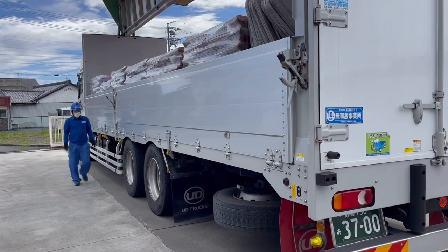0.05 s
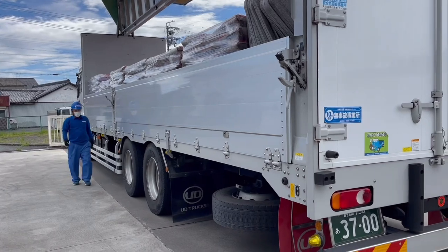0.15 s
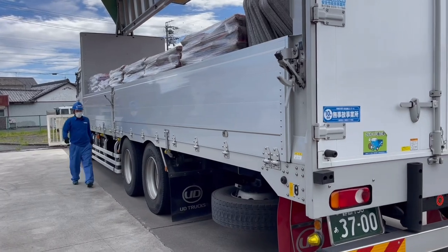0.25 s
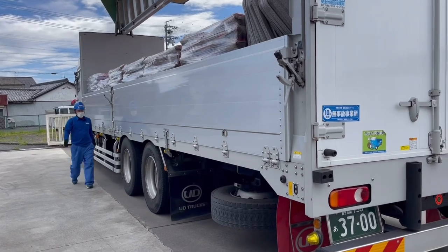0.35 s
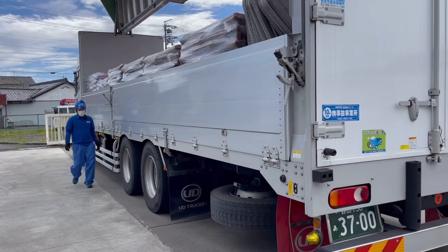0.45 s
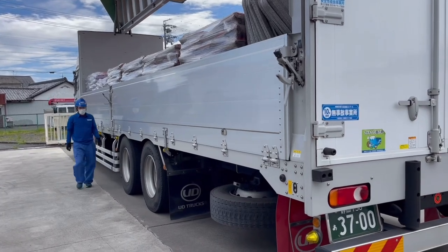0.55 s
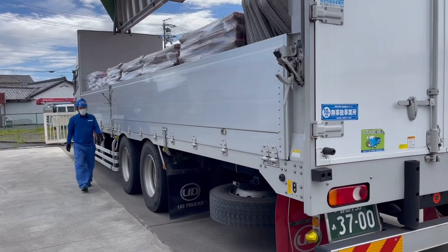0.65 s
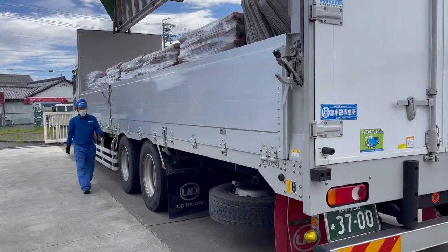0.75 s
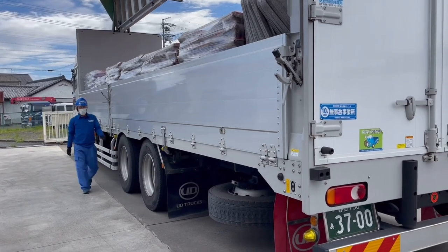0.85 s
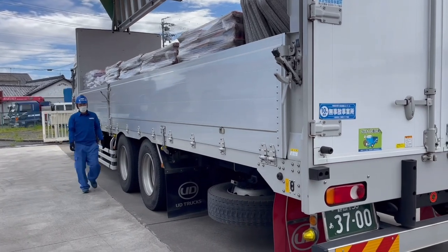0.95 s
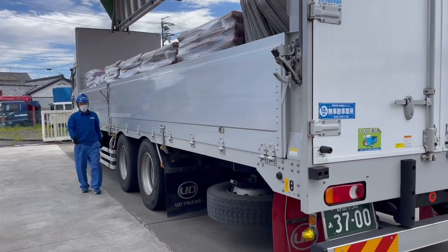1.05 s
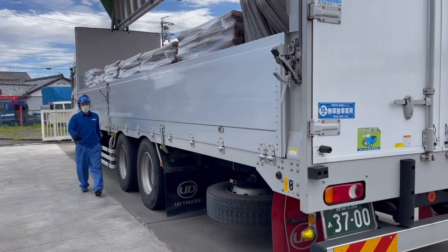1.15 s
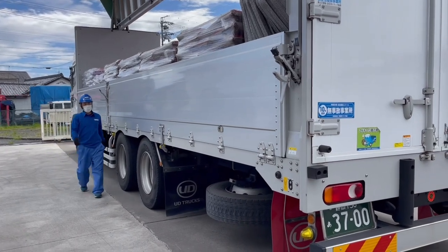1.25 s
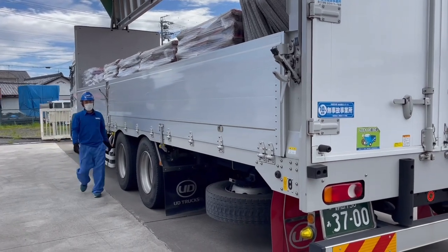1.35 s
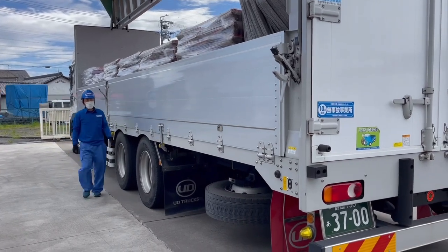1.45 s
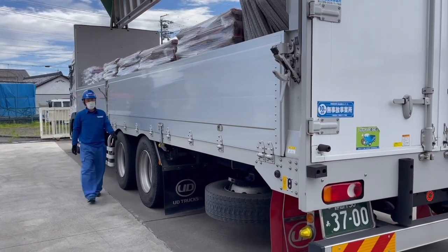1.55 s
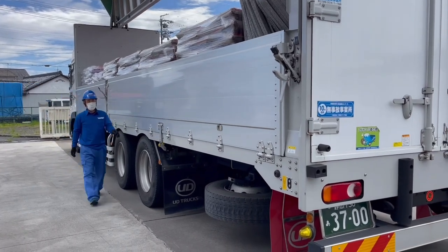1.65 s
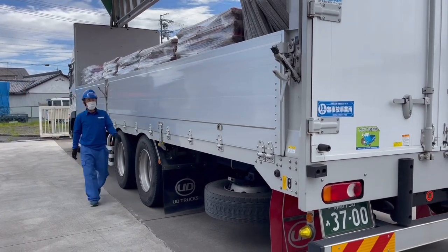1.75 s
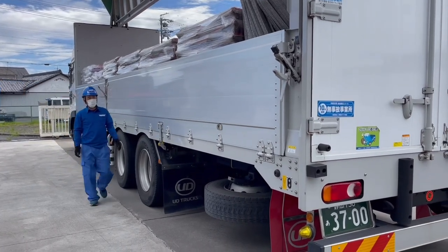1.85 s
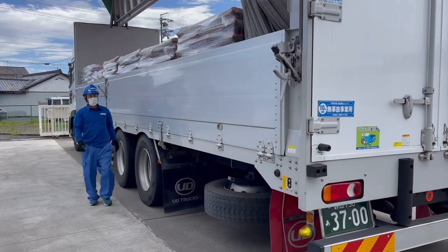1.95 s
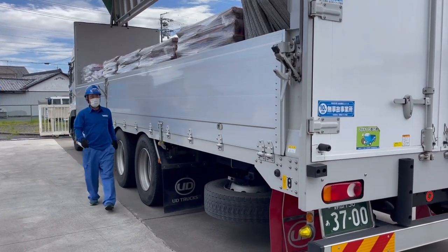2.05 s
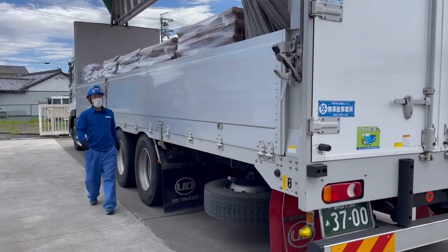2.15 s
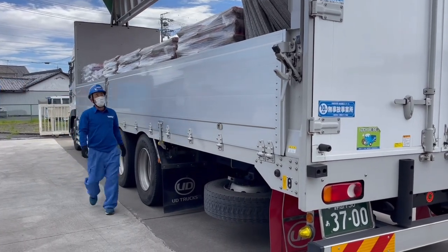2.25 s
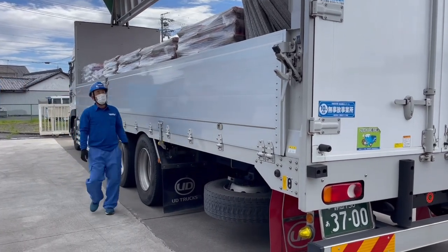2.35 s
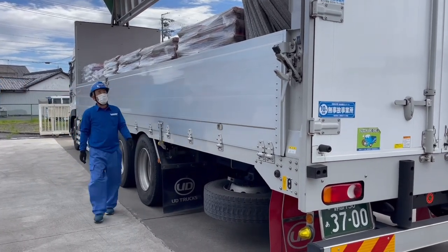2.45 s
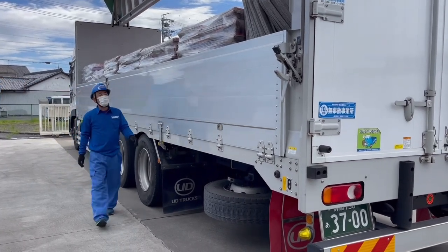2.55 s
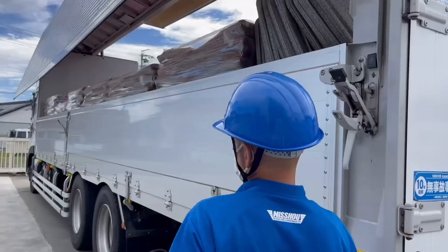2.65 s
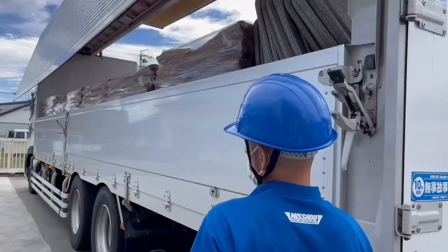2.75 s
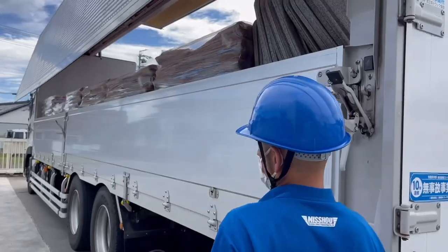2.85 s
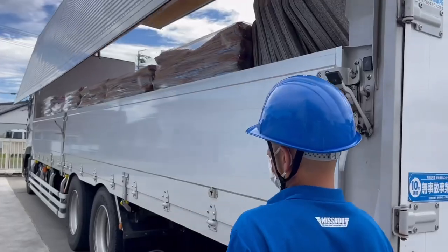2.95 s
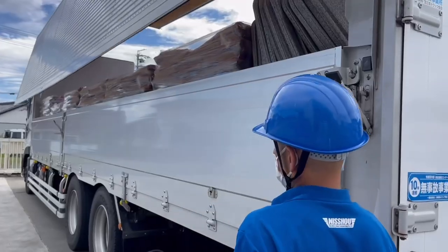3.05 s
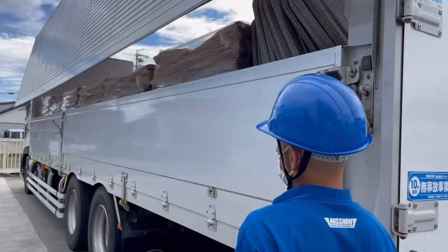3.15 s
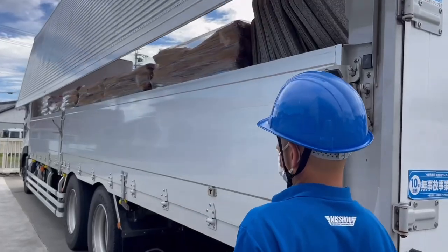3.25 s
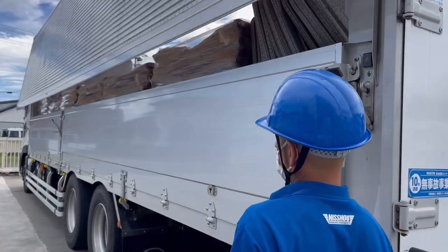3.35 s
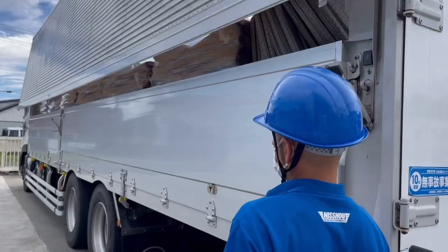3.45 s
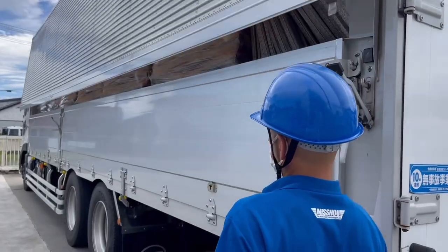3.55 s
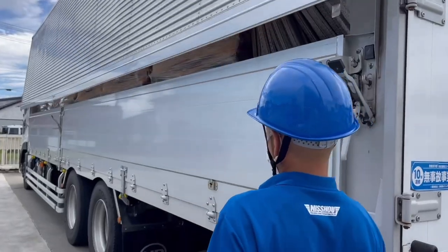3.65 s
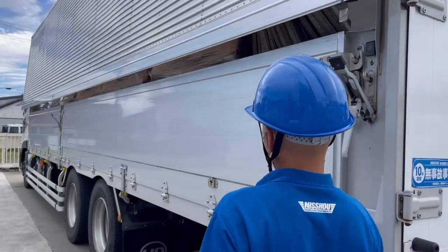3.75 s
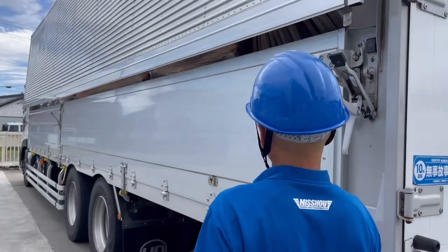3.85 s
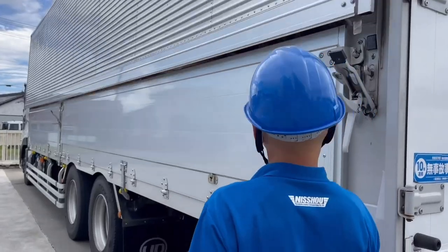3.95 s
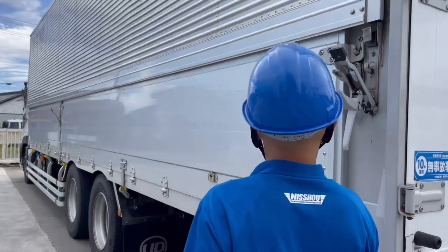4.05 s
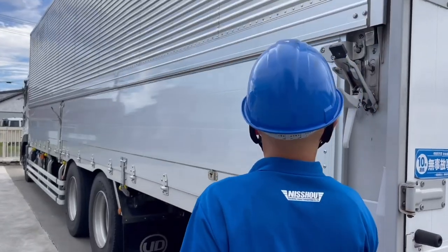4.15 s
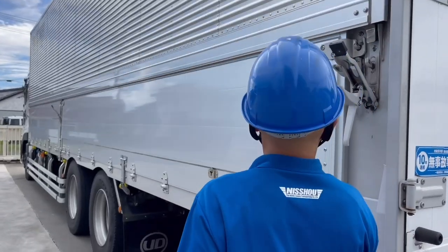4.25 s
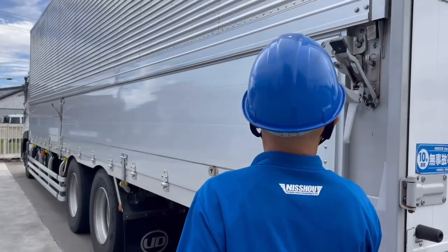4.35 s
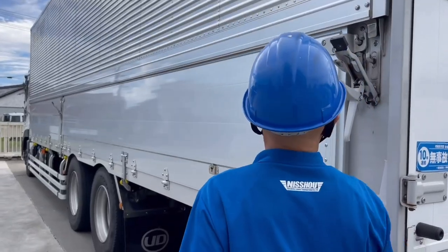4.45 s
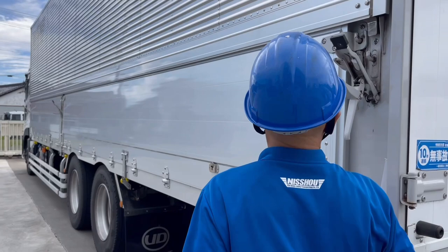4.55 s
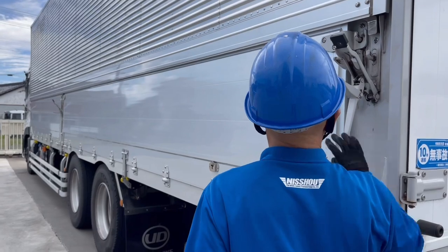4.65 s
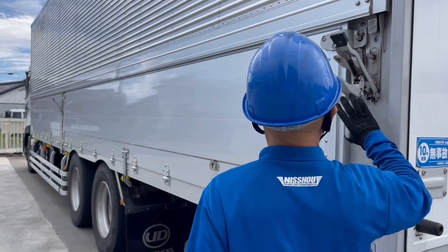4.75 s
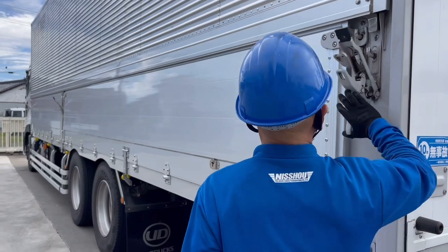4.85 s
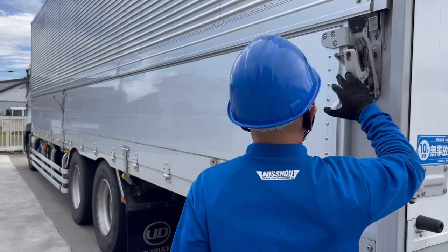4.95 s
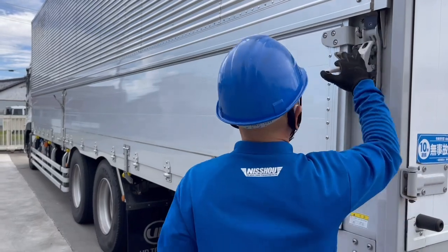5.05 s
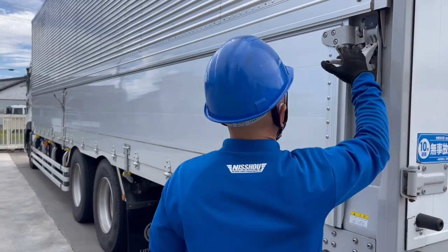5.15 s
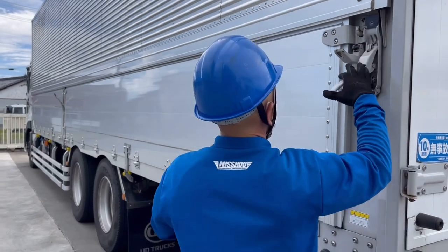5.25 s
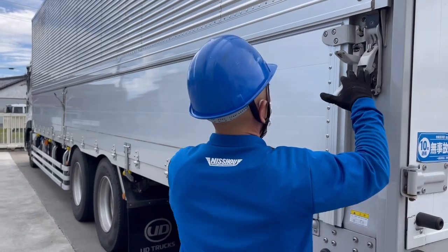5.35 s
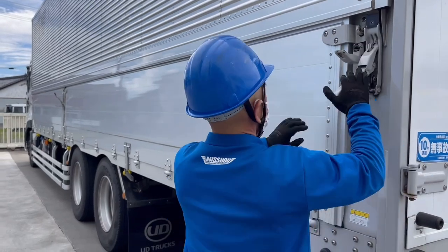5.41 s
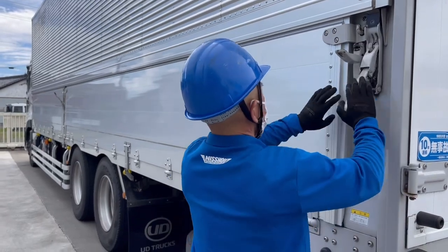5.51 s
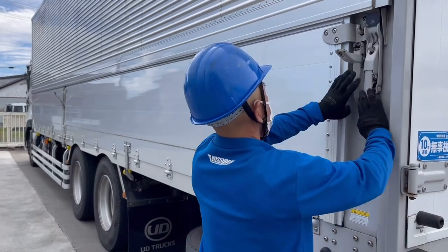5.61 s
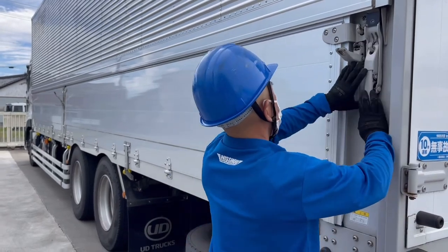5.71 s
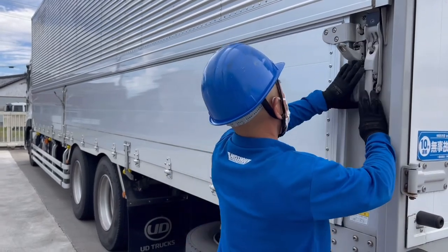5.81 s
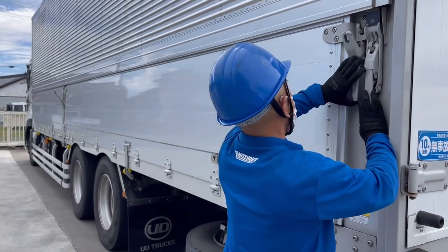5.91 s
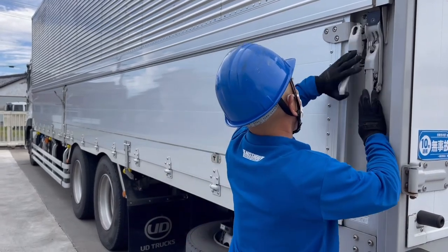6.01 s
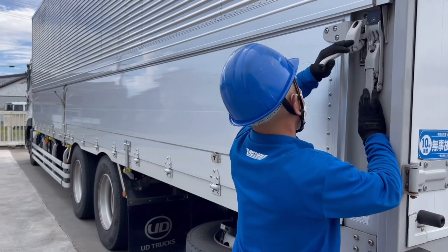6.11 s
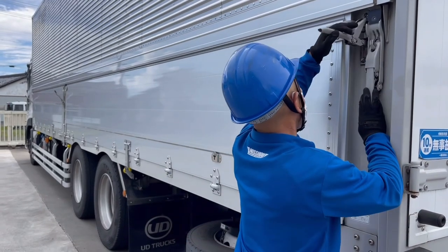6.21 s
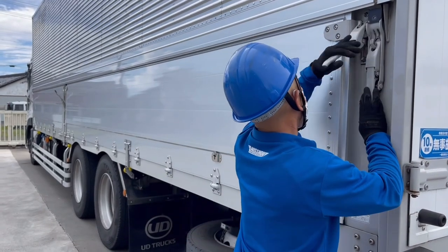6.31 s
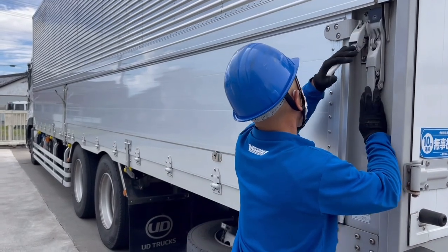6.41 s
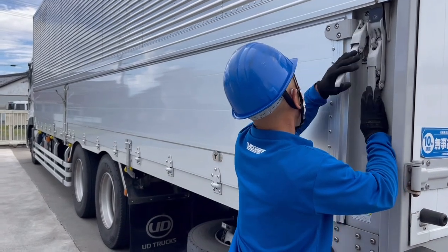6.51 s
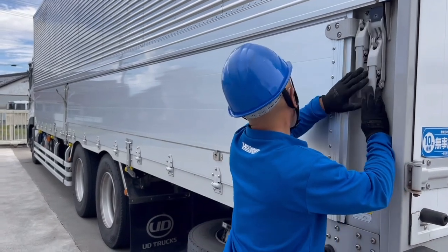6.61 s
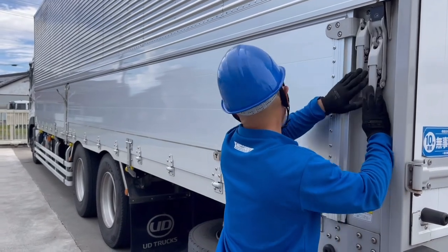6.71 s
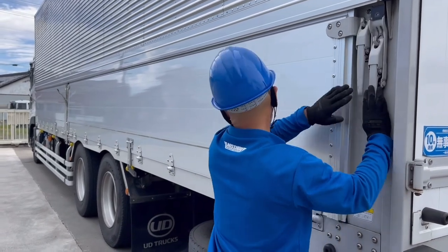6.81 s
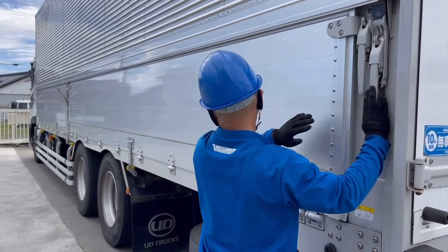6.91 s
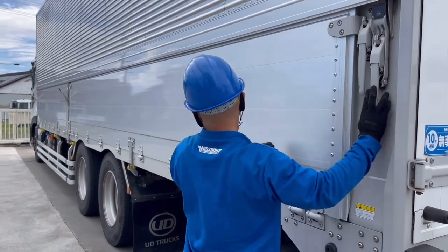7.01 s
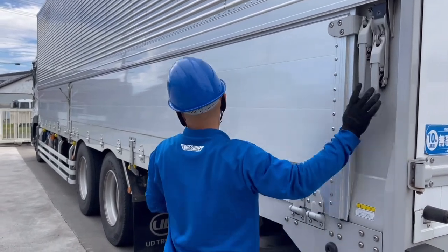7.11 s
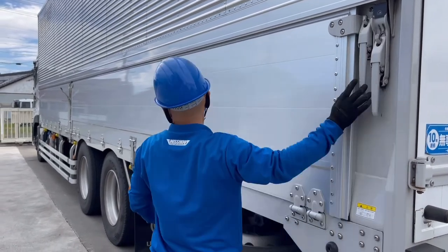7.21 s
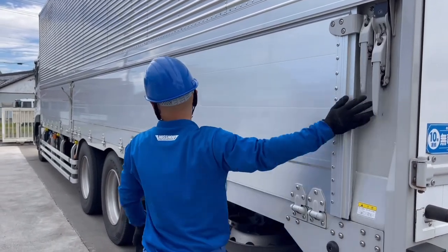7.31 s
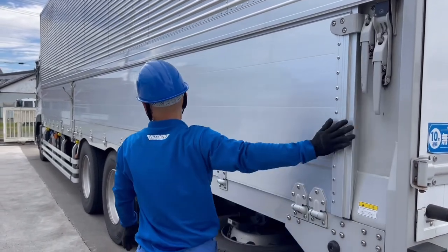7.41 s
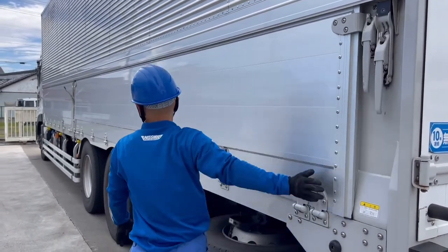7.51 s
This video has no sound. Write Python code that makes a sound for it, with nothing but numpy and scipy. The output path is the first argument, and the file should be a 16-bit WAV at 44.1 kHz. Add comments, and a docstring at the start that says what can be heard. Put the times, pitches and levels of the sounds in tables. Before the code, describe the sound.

Gusty low wind and road noise open the scene, with faint ticks and a thin pump whine. The sound abruptly moves close to the truck's side: rattling knocks and a rough, broken hinge squeal lead to a bright metal slam. Over a wavering engine hum, a worker throws steel levers in clustered, loud clanks, with scrapes between them and a faint distant trill. Short outdoor echoes, close stereo microphone.

```python
"""A windy truck yard: a truck's hydraulic side wing swings down over the idling engine and whining pump.
Noise bursts and ringing modes make its judder, a gliding tone its squeal, a bright crash its landing on the board.
A worker then throws steel latches shut close to the microphone: cracks, rings and booms, with scraping strokes.
Shaped noise gives wind, road, a passing lorry and a fine hiss; a throbbing tone gives a faint trill.
A limiter ducks the loudest moments and recovers after them."""
import sys
import numpy as np
from scipy import signal
from scipy.fft import rfft, irfft, next_fast_len
from scipy.io import wavfile
from scipy.ndimage import uniform_filter1d, minimum_filter1d

SR = 44100
rng = np.random.default_rng(int(sys.argv[2]) if len(sys.argv) > 2 else 0)


def put_to_file(sound):
    """Save the sound as 16-bit audio at rate SR, in the file named by the first command-line argument."""
    columns = np.atleast_2d(sound).T  # one column per channel
    safe = np.clip(columns, -1, 1)
    whole_steps = np.round(safe * 32767)
    wavfile.write(sys.argv[1], SR, whole_steps.astype(np.int16))


N = 333837
TIME = np.arange(N) / SR


def amp(db):
    """Decibels to gain."""
    return 10 ** (np.asarray(db) / 20)


def unit(x):
    """Scales to rms 1."""
    return x / np.sqrt(np.mean(x ** 2) + 1e-20)


def at_hz(points, hz):
    """Reads a spectrum on a log-frequency axis."""
    f, value = np.transpose(points)
    return np.interp(np.log(hz + 1), np.log(f + 1), value)


def curve(rows, axis=1):
    """One column of a timed table at every sample."""
    rows = np.array(rows)
    return np.interp(TIME, rows[:, 0], rows[:, axis])


def add(mix, s, sound):
    """Lays a sound into the mix at time s."""
    part = mix[:, max(round(s * SR), 0):][:, :sound.shape[-1]]
    part += sound[..., :part.shape[1]]


def fade(s, seconds):
    """1 before time s, falling to 0 over the given seconds."""
    return np.clip(1 - (TIME - s) / seconds, 0, 1)


def arch(s, length, skew):
    """One stroke: a gate open for its length, and an effort that rises and falls (skew > 1 peaks late)."""
    gate = np.clip(np.minimum(TIME - s, s + length - TIME) / .01, 0, 1)
    effort = np.sin(np.pi * np.clip((TIME - s) / length, 0, 1) ** skew)
    return gate, effort


def swell_and_die(t, swell, t60):
    """A straight rise under an exponential decay."""
    return np.minimum(t / swell, 1) * np.exp(-np.log(1000) * t / t60)


def wander(rate_hz):
    """Slow chance of rms 1: noise with its fast changes smoothed away."""
    size = next_fast_len(N, real=True)
    hz = np.fft.rfftfreq(size, 1 / SR)
    slow = rfft(rng.standard_normal(size)) * np.exp(-(hz / rate_hz) ** 2)
    return unit(irfft(slow, size)[:N])


# how alike noise is at the two microphone ports: (frequency [Hz], likeness [0 to 1])
LIKENESS = [(290, .82), (700, .5), (1400, .7), (3100, .85), (8000, .95)]


def port_noise(size, colour=((1, 0), (SR, 0))):
    """Coloured noise of rms 1, partly shared between the two ports."""
    hz = np.fft.rfftfreq(size, 1 / SR)
    shared, apart = rfft(rng.standard_normal((2, size)))
    same = np.clip(at_hz(LIKENESS, hz), 0, 1)
    mid, side = np.sqrt(1 + same) * shared, np.sqrt(1 - same) * apart
    ports = np.array([mid + side, mid - side])
    return unit(irfft(ports * amp(at_hz(colour, hz)), size))


def coloured(x, spectrum, bass_db, treble_db, peak_hz=1000, peak_db=0, size=2048):
    """Causal filter: an object's spectrum, tilted and peaked by where the blow lands."""
    hz = np.fft.rfftfreq(size, 1 / SR)
    gain = unit(amp(at_hz(spectrum, hz)))
    bass = bass_db / (1 + (hz / 800) ** 4)
    treble = treble_db * (1 - 1 / (1 + (hz / 4200) ** 4))
    peak = peak_db / (1 + ((hz - peak_hz) / (130 + .05 * peak_hz)) ** 2)
    log_gain = np.log(gain * amp(bass + treble + peak))
    # the Hilbert transform of the log gain gives the minimum phase
    minimum_phase = np.conj(signal.hilbert(np.r_[log_gain, log_gain[-2:0:-1]]))
    taps = np.fft.ifft(np.exp(minimum_phase)).real
    return signal.fftconvolve(x, taps[None], axes=1)


def ring(modes, t, t60, scatter_db, detune):
    """Dying modes; each blow weights and loads them a little differently."""
    hz, db = np.transpose(modes)[:, :, None]
    weight, shift, sign = rng.standard_normal((3, len(modes), 1))
    gain = amp(db + scatter_db * weight)
    partials = np.sign(sign) * np.sin(2 * np.pi * hz * (1 + detune * shift) * t)
    chord = (gain * partials).sum(0) / np.linalg.norm(gain)
    return chord * np.exp(-np.log(1000) * t / t60)


BOOM_SWELL_S = 0.004


def boom(modes, db, t60):
    """The van body or the side board booms under a heavy blow: low modes under one shared decay."""
    t = np.arange(SR // 2) / SR
    chord = ring(modes, t, t60=np.inf, scatter_db=1, detune=0.015)
    return amp(db) * swell_and_die(t, BOOM_SWELL_S, t60) * chord


# spectrum of the shaken panel: (frequency [Hz], relative level [dB])
WING_COLOUR = [(40, -35.5), (150, 2.5), (1050, 0.5), (1650, -4), (2300, -2.5), (3500, -8.5), (6000, -12.5),
               (11000, -11), (13200, -39), (17000, -78)]
CHATTER_DB, RATTLES_PER_S, RATTLE_DB = 3, 110, 9  # uneven shaking, and taps of loose parts
CHATTER_ONSET_S = 0.018  # the first blow is clean; the shaking builds up after it


def clatter(db, bass_db, treble_db, swell, t60, rib_hz=1000, rib_db=0):
    """A jolt shakes the ribbed panel into a clatter, with small taps of loose parts in it."""
    t = np.arange(SR // 2) / SR
    loose = 1 - np.exp(-t / CHATTER_ONSET_S)
    uneven = unit(uniform_filter1d(rng.standard_normal(len(t)), size=90))
    chatter = amp(CHATTER_DB * loose * uneven)
    taps = (rng.random(len(t)) < RATTLES_PER_S / SR) * rng.random(len(t))
    dying_taps = signal.lfilter([1], [1, -np.exp(-1 / (0.00089 * SR))], taps)
    rattle = 1 + amp(RATTLE_DB) * loose * dying_taps
    shake = swell_and_die(t, swell, t60) * chatter * rattle * port_noise(len(t))
    return amp(db) * coloured(shake, WING_COLOUR, bass_db, treble_db, rib_hz, rib_db)


# strength of the steady buffeting, eddies aside: (time [s], level [dB])
WIND = [(0, -38), (0.36, -27), (0.87, -29), (1.03, -21.5), (1.41, -21), (1.9, -18.5), (2.05, -40),
        (2.7, -21.5), (3.9, -20), (4.3, -16.5), (5.11, -23), (5.21, -28), (5.5, -20), (6.3, -23),
        (6.91, -22.5), (7.21, -30.5), (7.57, -23)]
# single gusts: (time of peak [s], length [s], level [dB])
GUSTS = [(1.117, 0.033, -18), (1.53, 0.079, -15.5), (3.774, 0.017, -15), (3.923, 0.024, -9.5),
         (4.582, 0.018, -13), (4.632, 0.025, -14.5), (4.762, 0.024, -14)]
# spectrum of the buffeting: (frequency [Hz], relative level [dB])
WIND_COLOUR = [(20, -39), (53, 0.5), (97, -1.5), (196, -7), (375, -21.5), (600, -38), (780, -74),
               (1320, -120)]
EDDY_RATIO, EDDY_DB = 1.78, 5  # small eddies: how much higher they lie, and their level at a force of 1


def wind():
    """Lumpy low buffeting swells in gusts; smaller, higher eddies grow with the square of its force."""
    lumps = amp(3.15 * wander(30.7))
    gusts = sum(amp(db) * np.exp(-(2 * (TIME - s) / length) ** 2) for s, length, db in GUSTS)
    force = np.hypot(amp(curve(WIND)) * unit(lumps), gusts)
    eddies = port_noise(N, [(hz * EDDY_RATIO, db) for hz, db in WIND_COLOUR])
    return force * (port_noise(N, WIND_COLOUR) + amp(EDDY_DB) * force * eddies)


# spectrum of road, lorry and wing rush: (frequency [Hz], relative level per Hz [dB])
ROAD_COLOUR = [(30, -19), (100, -3), (250, 1), (600, -4.5), (780, -2), (1100, -10), (2100, -15.5),
               (4200, -30), (9000, -37), (16000, -64)]
# spectrum of the fine hiss: (frequency [Hz], relative level per Hz [dB])
HISS_COLOUR = [(500, -7), (3000, -44), (4300, -4), (6000, 2.5), (7300, 1), (8600, 7.5), (10000, -3.5),
               (11100, -1.5), (12000, -18.5), (13000, -56)]
YARD_STOP_S = 2.69  # the sound of the open yard and its lorry breaks off abruptly here; the close rush of the wing takes over
STOP_S, SETTLE_S = 4.34, 0.29  # rush and pump start to run out, and how long that takes
YARD_DB, HISS_DB = -34, -43.5  # the steady background
LORRY_DB, LORRY_CLOSEST_S, LORRY_DISTANCE_M, LORRY_M_PER_S = -25, 2.47, 5.8, 14
FLOW_DB, FLOW_HISS_DB = -32.5, -41.5  # rush and hiss of the moving wing, from close by


def yard():
    """Road noise swells inversely with the lorry's distance; the moving wing then rushes under a fine hiss."""
    far = fade(YARD_STOP_S - .08, 0.037)
    along_m = LORRY_M_PER_S * (TIME - LORRY_CLOSEST_S)
    lorry = amp(LORRY_DB) * far * LORRY_DISTANCE_M / np.hypot(LORRY_DISTANCE_M, along_m)
    flow = (1 - far) * fade(STOP_S, SETTLE_S)
    road_level = np.sqrt(amp(YARD_DB) ** 2 + lorry ** 2 + (amp(FLOW_DB) * flow) ** 2)
    hiss_level = np.hypot(amp(HISS_DB), amp(FLOW_HISS_DB) * flow)
    road = road_level * amp(0.76 * wander(12)) * port_noise(N, ROAD_COLOUR)
    hiss = hiss_level * amp(0.7 * wander(30)) * port_noise(N, HISS_COLOUR)
    return road + hiss


# idling engine: (time [s], pitch [Hz], level [dB], level of the second order [dB])
ENGINE = [(0, 88.2, -54, -53), (2.7, 89.07, -48, -34), (4.5, 97.16, -28, -25), (6.1, 95.8, -24, -29.5),
          (7.0, 92.5, -25.5, -37.5), (7.57, 93.3, -29.5, -31)]
# the pump's whine: (time [s], pitch [Hz], level [dB])
PUMP = [(0.4, 740, -45), (2.5, 735, -37.5), (2.7, 788, -46), (4.3, 778, -42)]
PUMP_LOW_RATIO, PUMP_LOW_DB = 0.67, -5.5  # its weaker, lower partial


def engine():
    """A wavering hum of orders one, two and four, and a two-note pump whine that runs out after the landing."""
    phase = 2 * np.pi * np.cumsum(curve(ENGINE, axis=1) * (1 + 0.01415 * wander(12.5))) / SR
    upper_level = amp(curve(ENGINE, axis=3) + 2 * wander(26))
    upper = upper_level * (np.sin(2 * phase) + amp(-10.5) * np.sin(4 * phase))
    hum = amp(curve(ENGINE, axis=2) + 2 * wander(33)) * np.sin(phase) + upper
    turns = np.cumsum(curve(PUMP, axis=1) * (1 + 0.00688 * wander(26.5))) / SR
    low_partial = amp(PUMP_LOW_DB) * np.sin(2 * np.pi * PUMP_LOW_RATIO * turns)
    whine = np.sin(2 * np.pi * turns) + low_partial
    return hum + amp(curve(PUMP, axis=2) + 2 * wander(20)) * whine * fade(STOP_S, SETTLE_S)


# faint dry ticks: (time [s], level [dB])
TICKS = [(0.248, -34), (1.15, -34), (2.066, -35)]
TICK_SWELL_S, TICK_T60, TICK_BASS_DB, TICK_TREBLE_DB = 0.0086, 0.11, -16, 18
# the wing sticks and slips; a slip starts as a thin swelling rasp: (time [s], level [dB])
RASPS = [(2.688, -13), (3.016, -14), (3.261, -17), (3.554, -20.5), (3.808, -24), (3.9, -21.5), (4.088, -23),
         (4.262, -26)]
RASP_RIB_HZ, RASP_RIB_DB, RASP_TREBLE_DB = 2680, 2, -7
RASP_SWELL_S, RASP_T60, RASP_BASS_DB = 0.013, 0.21, -9
# the panel catches with a knock on one of its ribs:
# (time [s], level [dB], treble tilt [dB], rib pitch [Hz], boost at the rib's pitch [dB])
KNOCKS = [(2.676, -16, -2, 1137, -1), (2.837, -17.5, 0, 2043, 4), (3.053, -18, 0.5, 1180, -8),
          (3.173, -20.5, 1, 1260, 0), (3.181, -33, 18, 8600, 7), (3.295, -19.5, -3, 1140, -1),
          (3.414, -21.5, -1.5, 1220, 2.5), (3.521, -23, -1.5, 1315, 9.5), (3.819, -25, 0.5, 2250, 1),
          (3.851, -24.5, -7, 1100, -2), (3.962, -25.5, -4, 1210, 1), (4.056, -22.5, 3.5, 1900, 0),
          (4.078, -19.5, 1, 1010, 1), (4.138, -22, 6, 1520, 5.5), (4.173, -22, 2, 1570, 9),
          (4.394, -32.5, -16, 2210, 6), (4.717, -33, -10, 2560, -1)]
KNOCK_SWELL_S, KNOCK_T60, KNOCK_BASS_DB = 0.0013, 0.16, 5
RIB_DB, RIB_T60 = -3, 0.062  # a struck rib rings on briefly, at this level on top of its boost
# what the wing's aluminium skin rings with: (frequency [Hz], relative level [dB])
WING_MODES = [(689, 4.5), (818, 9), (1070, -3), (1310, 4), (2060, 0), (3080, 2)]
SKIN_DB, SKIN_T60 = -3, 0.11


def wing():
    """The wing judders down: ticks at first, then rasps and knocks that set rib and skin ringing."""
    out, t = np.zeros((2, N)), np.arange(SR // 4) / SR
    for s, db in TICKS:
        add(out, s, clatter(db, TICK_BASS_DB, TICK_TREBLE_DB, TICK_SWELL_S, TICK_T60))
    for s, db in RASPS:
        rasp = clatter(db, RASP_BASS_DB, RASP_TREBLE_DB, RASP_SWELL_S, RASP_T60, RASP_RIB_HZ, RASP_RIB_DB)
        add(out, s, rasp)
    for s, db, treble_db, rib_hz, rib_db in KNOCKS:
        add(out, s, clatter(db, KNOCK_BASS_DB, treble_db, KNOCK_SWELL_S, KNOCK_T60, rib_hz, rib_db))
        rib = ring([(rib_hz, 0)], t, RIB_T60, scatter_db=0, detune=0)
        skin = ring(WING_MODES, t, SKIN_T60, scatter_db=1.5, detune=0.016)
        ringing = amp(rib_db + RIB_DB) * rib + amp(SKIN_DB) * skin
        add(out, s, amp(db) * np.minimum(t / KNOCK_SWELL_S, 1) * ringing)
    return out


# the wing's dry hinge: (time [s], pitch [Hz], level [dB])
SQUEAL = [(2.64, 2090, -30.5), (2.8, 2113, -34.5), (3.0, 2180, -35.5), (3.14, 2165, -35.5),
          (3.23, 2210, -43), (3.37, 2252, -28), (3.56, 2200, -35.5), (3.67, 2010, -36)]
SQUEAL_OCTAVE_DB, OCTAVE_DB_PER_HZ = -6.5, -0.058  # a patchy octave that fades as the note climbs
# its last short squeaks: (time [s], length [s], pitch [Hz], level [dB])
SQUEAKS = [(3.822, 0.028, 2230, -30), (4.025, 0.032, 2180, -31)]


def squeal():
    """The dry hinge sings on one rough note that keeps breaking off, then gives short squeaks."""
    gate, _ = arch(SQUEAL[0][0], SQUEAL[-1][0] - SQUEAL[0][0], skew=1)
    hz, level = curve(SQUEAL, axis=1), gate * amp(curve(SQUEAL, axis=2))
    # the tone sounds only while the wandering grip stays above zero
    grip, octave_grip = (unit(np.maximum(wander(110) + bite, 0)) for bite in (.9, .8))
    note = level * grip
    octave = level * octave_grip * amp(SQUEAL_OCTAVE_DB + OCTAVE_DB_PER_HZ * (hz - hz.min()))
    for s, length, squeak_hz, db in SQUEAKS:
        gate, effort = arch(s, length, skew=1)
        hz = np.where(gate > 0, squeak_hz, hz)
        note = note + amp(db) * effort
    rough_hz = hz * (1 + .003 * wander(40) + .028 * wander(900))
    phase = 2 * np.pi * np.cumsum(rough_hz) / SR
    return note * np.sin(phase) + octave * np.sin(2 * phase)


# the wing meets the side board with a bright crash of steel
CRASH_S, CRASH_DB, CRASH_SWELL_S, CRASH_T60 = 4.151, -3.5, 0.0083, 0.091
# spectrum of the crash: (frequency [Hz], relative level [dB])
CRASH_COLOUR = [(700, 6), (2300, -10.5), (4000, -7.5), (5500, -3), (8000, 1.5), (9500, -4), (17000, -48)]
# then the whole side shakes, with a boost at the side board's strongest ring, and booms
SHAKE_LAG_S, SHAKE_DB, SHAKE_BASS_DB, SHAKE_T60, LANDING_BOOM_DB = 0.031, -25, 12.5, 0.51, -6.5
SHAKE_HZ, SHAKE_RING_DB = 1520, 8
# what the van body booms with: (frequency [Hz], relative level [dB])
BODY_MODES = [(44, -5.5), (72, -4.5), (137, 6), (190, -5), (245, 0), (320, -4), (385, -5)]
PUFF_DB, PUFF_SWELL_S, PUFF_T60 = -9.5, 0.016, 0.59  # air squeezed out of the closing gap


def landing():
    """The wing crashes onto the side board; the side shakes, the body booms and air puffs out of the gap."""
    out, t = np.zeros((2, N)), np.arange(SR // 2) / SR
    crash = swell_and_die(t, CRASH_SWELL_S, CRASH_T60) * port_noise(len(t), CRASH_COLOUR)
    add(out, CRASH_S, amp(CRASH_DB) * crash)
    shaken_s = CRASH_S + SHAKE_LAG_S
    shake = clatter(SHAKE_DB, SHAKE_BASS_DB, treble_db=9.0, swell=0.0033, t60=SHAKE_T60,
                    rib_hz=SHAKE_HZ, rib_db=SHAKE_RING_DB)
    add(out, shaken_s, shake)
    add(out, shaken_s, boom(BODY_MODES, LANDING_BOOM_DB, SHAKE_T60))
    puff = swell_and_die(t, PUFF_SWELL_S, PUFF_T60) * port_noise(len(t), WIND_COLOUR)
    add(out, shaken_s, amp(PUFF_DB) * puff)
    return out


# a faint trill: (time [s], length [s], level [dB])
TRILLS = [(4.76, 0.3, -41.5), (5.84, 0.16, -41), (6.39, 0.22, -39), (6.96, 0.38, -41.5)]
TRILL_HZ, TRILL_OCTAVE_DB, THROB_HZ = 1316, -3, 31


def trill():
    """A rasping trill far off, perhaps a bird: quick uneven throbs, each sliding down in pitch."""
    beat = np.cumsum(THROB_HZ * (1 + .15 * wander(10))) / SR % 1
    hz = TRILL_HZ * (1 + .07 * (.5 - beat) + .035 * wander(300))
    phase = 2 * np.pi * np.cumsum(hz) / SR
    voice = np.sqrt(np.sin(np.pi * beat)) * (np.sin(phase) + amp(TRILL_OCTAVE_DB) * np.sin(2 * phase))
    level = sum(amp(db) * np.sqrt(abs(arch(s, length, skew=0.68)[1])) for s, length, db in TRILLS)
    return voice * level


# latch blows, levels before the lift in scene():
# (time [s], level of the steel [dB], weight of the side board behind it [dB], treble tilt [dB],
#  loudest partial [Hz], boost at that partial [dB], level of the board's note [dB])
LATCHES = [(5.018, -6.5, -9, 4, 1150, 3.5, -19.5), (5.089, -11.5, -20, 12.5, 2060, 11.5, -20),
           (5.1992, -13.5, -26, -0.5, 1750, -6, -25.5), (5.5784, -21.5, -28.5, 11.5, 7940, 9, -32),
           (5.5998, -10, -8, 7.5, 1770, 8.5, -16), (6.016, -10, -22, 4, 2376, 3, -35),
           (6.184, -23.5, -19, 18, 7140, 4, -25.5), (6.2219, -22, -33, 9, 2230, 5, -37),
           (6.3028, -8.5, -30, 3.5, 3200, 0, -40), (6.562, -17.5, -14.5, 9.5, 4860, 13.5, -30),
           (6.578, -7, -11, 7, 2270, 4, -30)]
# spectrum of the struck steel: (frequency [Hz], relative level [dB])
LATCH_COLOUR = [(100, -15), (400, 1.5), (1100, 4), (3500, -7), (6400, -17.5), (7600, -11.5), (9500, -9),
                (10800, -6), (13000, -30), (17000, -60)]
FULL_T60, BOARD_DB_PER_HALVING = 0.11, 19  # the less a blow reaches the board, the shorter it rings
BOUNCE_S, BOUNCE_WIDTH_S, BOUNCE_DB = 0.0075, 0.0018, -18  # the latch bounces once on its catch
# what latch and side board ring with: (frequency [Hz], relative level [dB])
LATCH_MODES = [(690, 1), (930, 5), (1065, 6), (1165, 7), (1438, 4), (1620, 0), (1868, 1), (2250, 9),
               (2700, 2), (7450, -1), (8800, 4)]
FITTING_DB, FITTING_T60, LEVER_DB, LEVER_T60 = -3.5, 0.066, -9.5, 0.047  # fitting and lever ring briefly
RATTLE_LAG_S, BOARD_RATTLE_DB, BOARD_T60 = 0.011, -13.5, 0.21  # the board rattles after a latch blow
BOOM_LAG_S, BOOM_T60, BOOM_DB = 0.0149, 0.23, -5  # the van body answers the board
# the side board's hollow note: (frequency [Hz], relative level [dB])
BOARD_MODES = [(335, -2), (386, -1), (443, -2.5), (883, -12)]
BOARD_NOTE_T60 = 0.25


def latches():
    """Steel strikes steel and bounces: crack, short clatter and ring; the board rattles, hums and booms."""
    out, t = np.zeros((2, N)), np.arange(SR // 4) / SR
    for s, db, board_db, treble_db, partial_hz, partial_db, note_db in LATCHES:
        t60 = FULL_T60 * 2 ** (board_db / BOARD_DB_PER_HALVING)
        bass_db = board_db - db
        body = np.exp(-np.log(1000) * t / t60)
        crack = 0.36 * np.exp(-t / 0.0016)
        bounce = amp(BOUNCE_DB) * np.exp(-((t - BOUNCE_S) / BOUNCE_WIDTH_S) ** 2)
        blow = (body + crack + bounce) * np.minimum(t / 0.00074, 1)
        steel = coloured(blow * port_noise(len(t)), LATCH_COLOUR, bass_db, treble_db, partial_hz, partial_db)
        fitting = ring(LATCH_MODES, t, FITTING_T60, scatter_db=-1.0, detune=0.011)
        lever = ring([(partial_hz, 0)], t, LEVER_T60, scatter_db=0, detune=0)
        add(out, s, amp(db) * steel)
        add(out, s, amp(db) * (amp(bass_db / 2 + FITTING_DB) * fitting + amp(LEVER_DB) * lever))
        rattle = clatter(board_db + BOARD_RATTLE_DB, bass_db=14.5, treble_db=-2.5, swell=0.0058, t60=BOARD_T60)
        add(out, s + RATTLE_LAG_S, rattle)
        add(out, s + BOOM_LAG_S, boom(BODY_MODES, board_db + BOOM_DB, BOOM_T60))
        add(out, s + BOOM_LAG_S, boom(BOARD_MODES, note_db, BOARD_NOTE_T60))
    return out


# the worker's gloves work the lever: (time [s], length [s], level before the sag [dB])
STROKES = [(5.83, 0.15, -31.5), (6.03, 0.28, -25)]
STROKE_SAG_DB = -5.5  # taken 1.5 times at the height of a stroke and 2.5 times at both ends


def handling(ticks_per_s):
    """The lever scrapes in its guide: a dense run of tiny slips keeps the fitting ringing under each stroke."""
    slips = (rng.random(N) < ticks_per_s / SR) * rng.uniform(-1, 1, N) ** 3
    fitting = ring(LATCH_MODES, np.arange(SR // 4) / SR, FITTING_T60, scatter_db=0, detune=0.012)
    ringing = signal.fftconvolve(slips, fitting)[:N]
    rubbed = unit(slips) + amp(-4) * unit(ringing)
    scrape = coloured(np.array([rubbed, rubbed]), LATCH_COLOUR, bass_db=-0.5, treble_db=-10.0)
    force = np.zeros(N)
    for s, length, db in STROKES:
        gate, effort = arch(s, length, skew=0.59)
        force += gate * amp(db + STROKE_SAG_DB * (2.5 - effort))
    return force * unit(scrape[:, :N] * amp(3 * wander(45)))


# echo decay off truck and ground: (frequency [Hz], T60 [s])
ECHO_T60 = [(100, 0.41), (1000, 0.15), (3000, 0.14), (9000, 0.027)]


def echoes(x):
    """A short scattered tail whose treble dies first: noise decaying at its own rate in each band."""
    hz, t, z = signal.stft(port_noise(SR // 2), SR, nperseg=256)
    decay = np.exp(-np.log(1000) * t / at_hz(ECHO_T60, hz)[:, None])
    tail = signal.istft(z * decay, SR, nperseg=256)[1]
    tail = tail * np.minimum(np.arange(tail.shape[1]) / SR / 0.0013, 1)
    return signal.fftconvolve(x.mean(0)[None], tail / np.linalg.norm(tail[0]), axes=1)[:, :N]


# phase of the left port against the right: (frequency [Hz], phase [radians])
PORT_PHASE = [(0, 0), (1290, -.4), (3000, .5), (5500, .9), (7500, .6), (8700, -.1), (10200, -3.1),
              (12000, -6), (15200, -12.5)]
# level of the left port over the right: (frequency [Hz], level [dB])
PORT_BALANCE = [(60, 0.74), (1100, 1.7), (3600, 4.7), (8100, 0.55)]


def scene():
    """All sources and their echoes, reaching the two ports with their own phase and level."""
    panel = wing() + landing() + squeal()
    steel = amp(6.0) * latches() + handling(ticks_per_s=700)
    tail = echoes(amp(-10.5) * panel + amp(-12.5) * steel)
    mix = wind() + yard() + engine() + trill() + panel + steel + tail
    hz = np.fft.rfftfreq(N, 1 / SR)
    # each port takes half of the phase and level difference
    left = amp(at_hz(PORT_BALANCE, hz) / 2) * np.exp(.5j * at_hz(PORT_PHASE, hz))
    return irfft(rfft(mix) * np.array([left, 1 / left]), N)


EDGE_HZ = 16900  # upper band limit


def record(dry):
    """A limiter clamps within milliseconds, holds, then recovers; peaks that slip through overload; low-pass."""
    keep = np.exp(-1 / (0.0045 * SR))
    power = signal.lfilter([1 - keep], [1, -keep], (dry ** 2).mean(0))
    over_db = np.maximum(10 * np.log10(power + 1e-12) + 9, 0)  # excess above -9 dB
    held_db = -minimum_filter1d(-over_db, size=4001, origin=2000)  # highest excess of the last 4001 samples
    recovery_db = 75 * TIME  # 75 dB per second
    reduction_db = np.maximum.accumulate(held_db + recovery_db) - recovery_db
    ducked = dry * amp(-reduction_db)
    clipped = ducked / (1 + ducked ** 6) ** (1 / 6)
    low_pass = signal.firwin(511, EDGE_HZ, window=("kaiser", 9), fs=SR)
    return signal.oaconvolve(clipped, low_pass[None], "same")


dry = scene()
out = record(dry)
put_to_file(out)
```